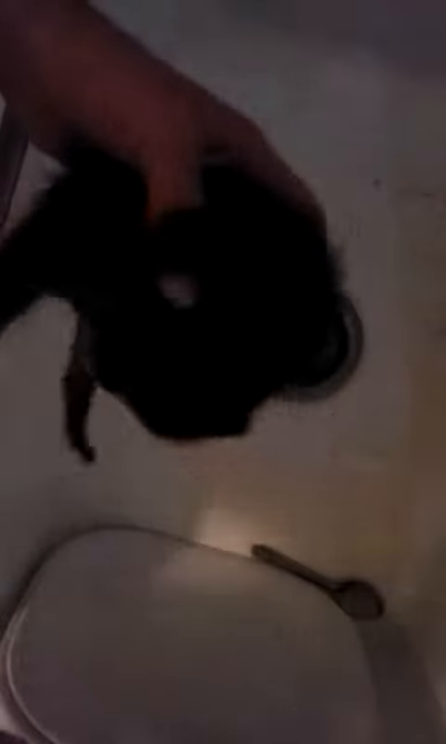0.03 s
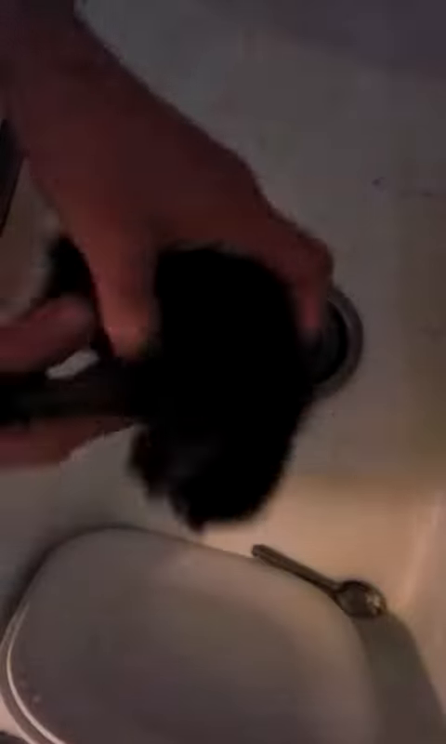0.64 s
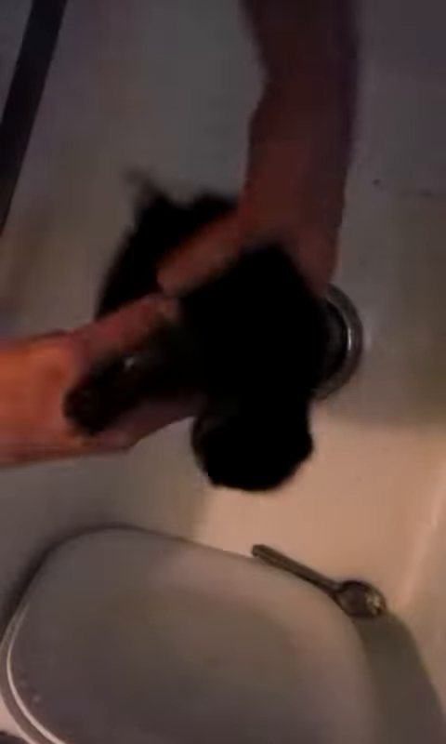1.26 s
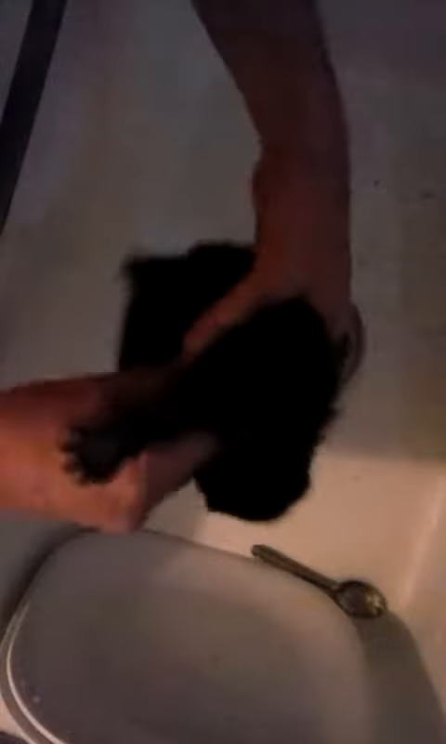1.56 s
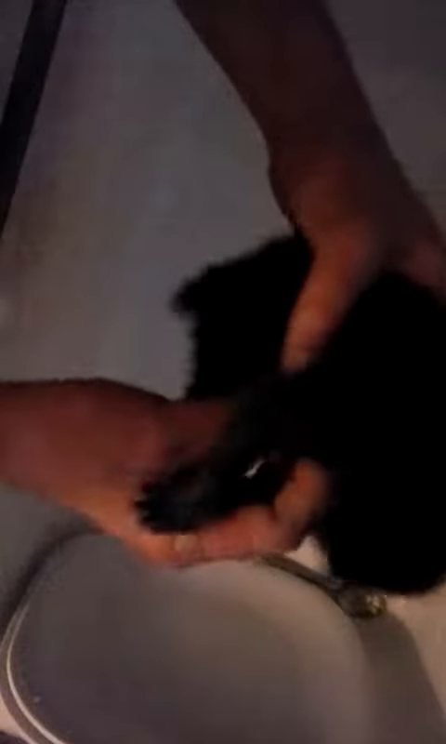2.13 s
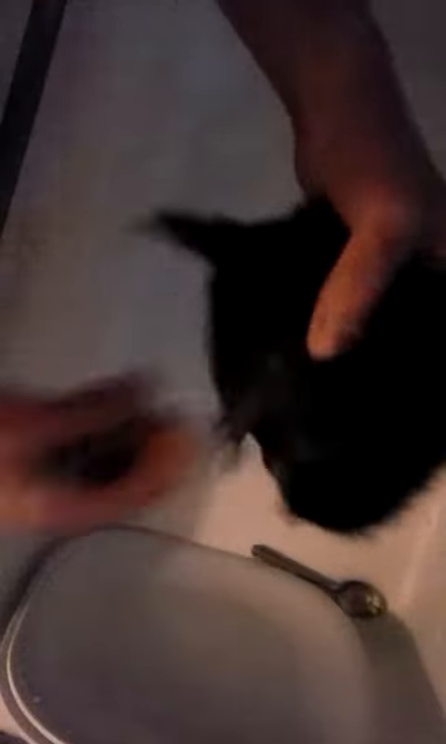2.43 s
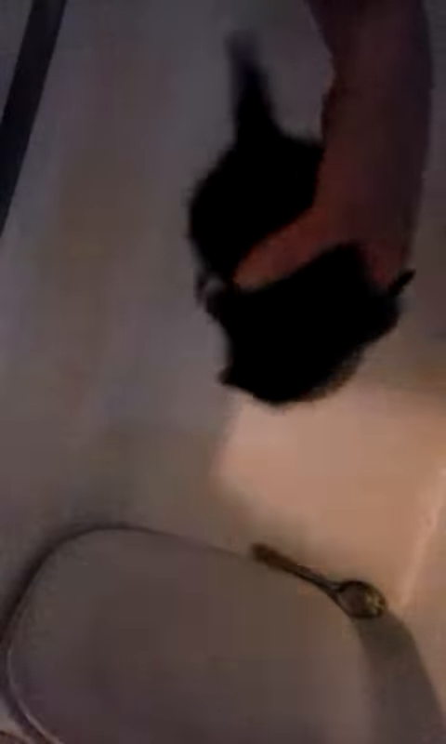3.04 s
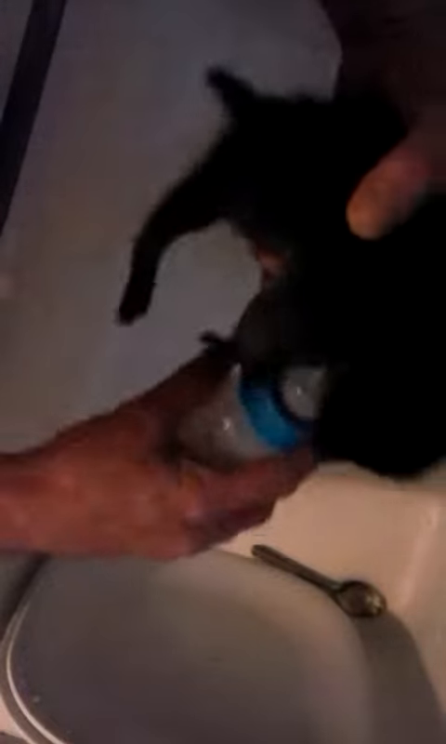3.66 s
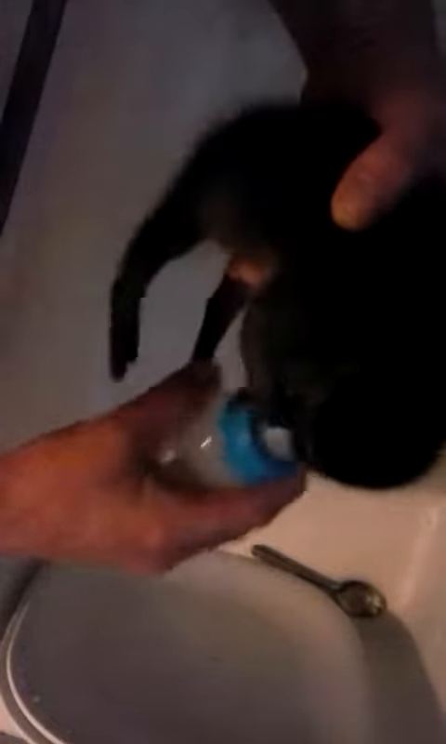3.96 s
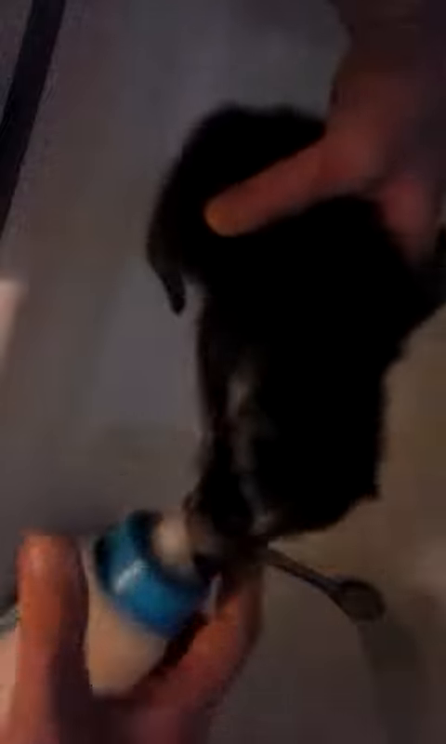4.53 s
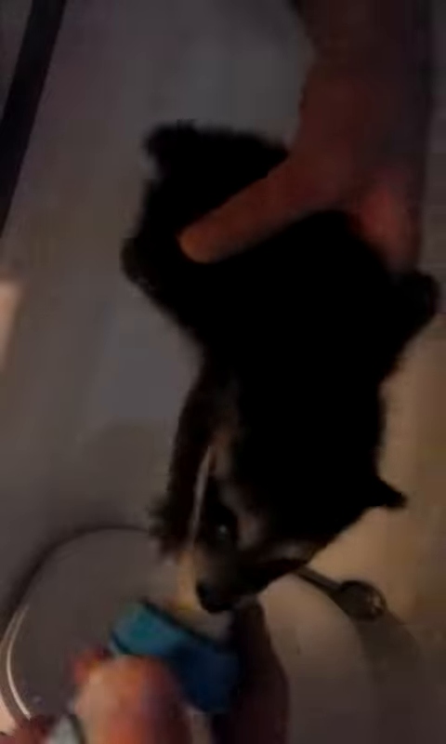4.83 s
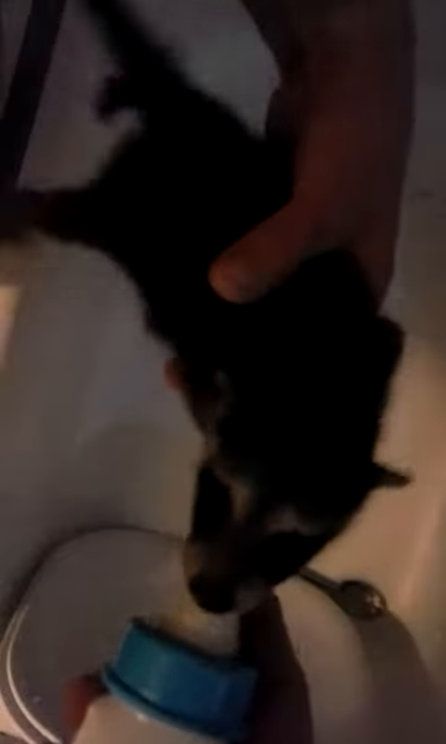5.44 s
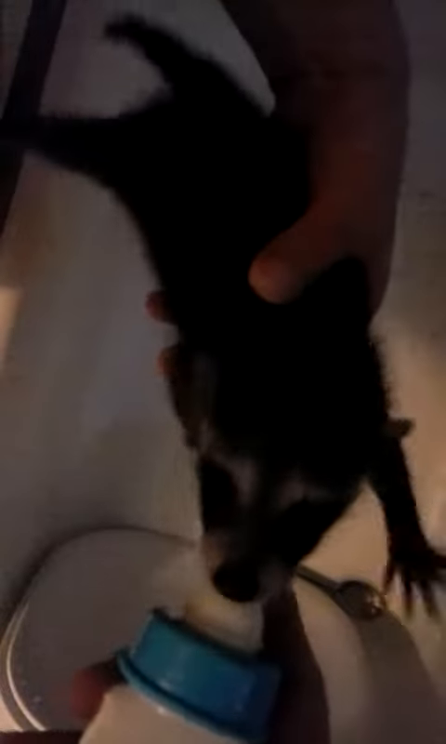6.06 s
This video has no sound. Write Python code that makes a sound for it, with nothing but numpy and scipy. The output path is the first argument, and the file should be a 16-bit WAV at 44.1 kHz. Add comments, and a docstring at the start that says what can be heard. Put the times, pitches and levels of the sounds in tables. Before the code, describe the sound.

Close, high-pitched cries from a raccoon cub in a small room give way to soft lip smacks, tongue clicks and squeaky bottle sucking.

```python
"""A baby raccoon screeches five times in a tub, close by, its vocal folds straining, and pants in between.
Then it sucks at a bottle: wet lip smacks, tongue clicks, bursting milk bubbles, air squeaking at the teat.
Its fur slides under the hand that holds it and its body bumps the tub, whose walls throw its voice back.
There are a few faint knocks; the small room has a low hum and a thin, high electrical whistle."""
import sys
import numpy as np
from scipy import signal
from scipy.fft import rfft, irfft, next_fast_len
from scipy.io import wavfile
from scipy.ndimage import uniform_filter1d, minimum_filter1d

SR = 44100
rng = np.random.default_rng(int(sys.argv[2]) if len(sys.argv) > 2 else 0)


def file_out(sig):
    """Save sig as 16-bit WAV at sys.argv[1]."""
    # one column per channel
    cols = np.atleast_2d(sig).T
    # limit, then scale
    lim = np.clip(cols, -1, 1)
    pcm = np.round(lim * 32767).astype(np.int16)
    wavfile.write(sys.argv[1], SR, pcm)


N = 277830
TIME = np.arange(N) / SR


def gain_of(db):
    return 10 ** (np.asarray(db) / 20)


def unit_rms(x):
    return x / np.sqrt(np.mean(x ** 2) + 1e-20)


def at_hz(points, hz):
    """Interpolates (f, value) points on a log-frequency axis."""
    f, value = np.transpose(points)
    return np.interp(np.log(hz + 1), np.log(f), value)


def span(length_s):
    return TIME[:round(length_s * SR)]


def add(mix, start_s, sound):
    part = mix[max(round(start_s * SR), 0):][:len(sound)]
    part += sound[:len(part)]


def filtered(x, gain_at_hz):
    size = next_fast_len(2 * len(x))
    return irfft(rfft(x, size) * gain_at_hz(np.fft.rfftfreq(size, 1 / SR)), size)[:len(x)]


def coloured(x, spectrum):
    """Filters x by (f/Hz, level/dB) points; rms 1."""
    return unit_rms(filtered(x, lambda hz: gain_of(at_hz(spectrum, hz))))


def lowpass(x, edge_hz, order=12):
    return filtered(x, lambda hz: 1 / (1 + (hz / edge_hz) ** order))


def noise(t):
    whole_seconds = len(t) // SR + 1
    return rng.standard_normal(whole_seconds * SR)[:len(t)]


def wander(t, rate_hz):
    """Random drift up to about rate_hz; rms 1."""
    return unit_rms(lowpass(noise(t), rate_hz, order=4))


def resonate(x, hz, width_hz):
    """Unity-gain resonance that follows the curve hz."""
    carrier = np.exp(2j * np.pi * np.cumsum(hz) / SR)
    pole = np.exp(-np.pi * width_hz / SR)
    return 2 * (carrier * signal.lfilter([1 - pole], [1, -pole], x / carrier)).real


def fuzzy_tone(t, hz, width_hz):
    """Noise through three equal resonances; rms 1."""
    x = noise(t)
    for _ in range(3):
        x = resonate(x, np.broadcast_to(hz, t.shape), width_hz)
    return unit_rms(x)


# room air spectrum: f/Hz, relative level/dB
AIR_SPECTRUM = [(25, -19.5), (42, -6.5), (65, 3.5), (130, -8), (200, -12), (400, -18), (1000, -29),
                (2500, -29.5), (4200, -37.5), (6500, -30), (8250, -13), (10000, -20.5), (15000, -17)]
# hum partials: f/Hz, level/dB
HUM_PARTIALS = [(59, -65.5), (86, -63.5), (119, -65.5)]
# whistle envelope: t/s, relative level/dB
WHISTLE_ENVELOPE = [(0, -46), (1.1, -47.5), (1.7, -52), (2.15, -44), (2.7, -60.5), (2.9, -44), (4.2, -47.5),
                    (4.6, -44.5), (6.3, -46.5)]


def background(air_db=-55.5, whistle_hz=15736, tremolo_hz=11.5):
    """Room air, a wavering low hum and a thin, high electrical whistle with a fast tremolo added."""
    air = gain_of(air_db) * coloured(noise(TIME), AIR_SPECTRUM)
    hum = sum(gain_of(db + 3 * wander(TIME, 5)) * np.sin(2 * np.pi * hz * TIME + wander(TIME, 4.5))
              for hz, db in HUM_PARTIALS)
    tremolo = 1 + .45 * np.sin(2 * np.pi * tremolo_hz * TIME + wander(TIME, 2))
    whistle_db = np.interp(TIME, *np.transpose(WHISTLE_ENVELOPE)) - 1 + 2 * wander(TIME, 35)
    whistle = gain_of(whistle_db) * tremolo * np.sin(2 * np.pi * whistle_hz * TIME)
    return air + np.sqrt(2) * (hum + whistle)


# high hiss of fur and nose: f/Hz, relative level/dB
HISS_SPECTRUM = [(3500, -36.5), (5500, -19.5), (7000, -10.5), (8300, 1), (10500, -8.5), (13000, -16.5),
                 (16000, -20)]
# dull rush of body rub and airway: f/Hz, relative level/dB
RUSH_SPECTRUM = [(150, -33), (420, -3.5), (750, -4.5), (1250, 1), (1700, -12), (2400, -14.5), (3200, -38),
                 (4500, -51)]
# hand strokes: centre t/s, level/dB, half-width/s
STROKES = [(0.003, -46, 0.27), (0.709, -51, 0.091), (2.373, -49, 0.057), (2.84, -55.5, 0.17),
           (2.975, -59.5, 0.024), (4.47, -51, 0.0196), (4.727, -61, .04), (6.156, -54.5, 0.027)]


def fur_rustle(rub_db=-15, resting_db=-63, grain_db=3):
    """Fur slides under the hand with a grainy hiss; the body rubs dully on the tub."""
    strokes = sum(gain_of(db) * np.exp(-((TIME - s) / width_s) ** 2) for s, db, width_s in STROKES)
    grains = noise(TIME) * gain_of(grain_db * wander(TIME, 120))
    friction = coloured(grains, HISS_SPECTRUM) + gain_of(rub_db) * coloured(grains, RUSH_SPECTRUM)
    return (gain_of(resting_db) + strokes) * friction


# tongue clicks: t/s, peak level/dB, f/Hz
CLICKS = [(0.0265, -27, 8100), (0.0567, -22.5, 8800), (0.1451, -18, 8330), (1.057, -8.5, 8540),
          (1.1653, -32.5, 1810), (2.029, -23, 6520), (2.2761, -23.5, 8340), (3.8804, -1.5, 8440),
          (5.26, -10, 7330), (5.264, -17.5, 6700), (5.2933, -16.5, 8330), (5.3966, -14, 8500),
          (5.456, -23, 8784)]


def tongue_clicks(decay_cycles=9.8, droop=.066, rise_s=.0001, fizz=.48):
    """A film of spit snaps; a tiny cavity rings, its pitch falling as it opens."""
    out, t = np.zeros(N), TIME[:SR // 40]
    for start_s, peak_db, hz in CLICKS:
        fade = np.exp(-t * hz / decay_cycles)
        tone = np.sin(2 * np.pi * np.cumsum(hz * (1 + droop * (2 * fade - 1))) / SR)
        snap = (1 - np.exp(-t / rise_s)) ** 2 * fade * (tone + fizz * fuzzy_tone(t, hz, hz / 2))
        snap = lowpass(snap, 1.1 * hz, order=8) - lowpass(snap, hz / 2, order=6)
        add(out, start_s, gain_of(peak_db) * snap / abs(snap).max())
    return out


# pants: t/s, length/s, relative level/dB, wheeze start f/Hz, end f/Hz, wheeze share/0-1
PANTS = [(0.146, 0.052, -26.5, 750, 1510, .3), (0.578, 0.1, -34.5, 936, 1496, 0.16),
         (0.821, 0.065, -36, 1190, 1270, 0.48), (1.24, 0.081, -27, 1400, 1100, 0.6),
         (1.703, 0.074, -31.5, 1331, 450, 0.35), (1.745, 0.036, -45.5, 270, 220, .9),
         (1.936, 0.06, -31.5, 1170, 1290, 0.41), (1.979, 0.063, -34, 1300, 1610, 0.51),
         (2.539, 0.045, -31, 543, 417, 0.54), (3.2, 0.016, -43, 1200, 1400, .4),
         (3.226, 0.045, -34, 1450, 1600, 0.77), (3.622, 0.054, -50.5, 1017, 1104, 0.05)]


def pant(length_s, level_db, from_hz, to_hz, share, hiss_db=-9):
    """Air wheezes through the cub's narrow airway, then hisses in its nose."""
    t = span(length_s)
    rush = coloured(noise(t), RUSH_SPECTRUM)
    rush = unit_rms(rush - lowpass(rush, min(from_hz, to_hz) / 2))
    wheeze = fuzzy_tone(t, np.geomspace(from_hz, to_hz, len(t)), width_hz=260)
    hiss = gain_of(hiss_db) * np.linspace(.3, 1.4, len(t)) * coloured(noise(t), HISS_SPECTRUM)
    swell_db = np.interp(t / length_s, [0, .6, 1], [-13, -1, -14]) + 2 * wander(t, 88)
    breath = unit_rms((1 - share) * rush + share * wheeze) + hiss
    return gain_of(level_db + swell_db) * breath * signal.windows.tukey(len(t), .25)


def roughness(t, length_s, middle, onset=.9):
    """Noisy share of the voice: high at the onset, settling, rising again at the end."""
    settle_s = min(.027, length_s / 4)
    starting = np.exp(-(t / settle_s) ** 2)
    ending = np.exp(-np.maximum(length_s - t, 0) / settle_s) / 2
    return np.clip(middle + (onset - middle) * np.maximum(starting, ending), .2, .95)


def vocal_folds(t, hz, rough):
    """Strained folds slip between a wavering pitch and rasping puffs of air."""
    jitter = 1 + .035 * rough * wander(t, 400) + .045 * rough * wander(t, 60)
    phase = 2 * np.pi * np.cumsum(hz * jitter) / SR
    tone = np.zeros(len(t))
    for k in range(1, 16):
        swell = gain_of(3.5 * wander(t, 45))  # the head jerks about in the tub
        offset = 2 * np.pi * rng.random() * (k not in (2, 4))  # 2 and 4 are reinforced in phase below
        tone += swell * np.cos(k * phase + offset)
    # the mouth is tuned to harmonic 4
    tone = lowpass(unit_rms(tone), 8000, order=2) + .45 * np.cos(4 * phase)
    # the fundamental drops out as the voice breaks up
    tone -= np.minimum(rough / .8, 1) ** 4 * lowpass(tone, 1400)
    puffs = unit_rms((1 + .6 * np.cos(phase)) * noise(t))
    rasp = puffs - lowpass(puffs, 1500, order=6) + gain_of(2) * resonate(puffs, 4 * hz, 400)
    blend = ((1 - rough) * tone + rough * rasp) / np.hypot(1 - rough, rough)
    second_harmonic = gain_of(-9) * (1 - rough) ** 2 * np.cos(2 * phase)
    return (blend + second_harmonic) * gain_of(1.8 * wander(t, 110))


# throat and open mouth: f/Hz, relative level/dB
THROAT_SPECTRUM = [(520, -10.5), (1000, -15.5), (1400, -10), (2100, -7), (2550, -10), (3200, -5.5),
                   (4000, -4), (5200, -16), (7000, -14), (8400, 4), (9400, -1), (11200, -12),
                   (15500, -18.5)]
# screeches, the last with a short extra push: t/s, length/s, relative level/dB, swell/dB, f/Hz,
# end f/Hz, roughness/0-1, low band/dB, top band/dB, catch delay/s, catch depth/dB
SCREECHES = [(0.193, 0.16, -10, 11, 1064, 1078, 0.45, -5.5, -1.5, .043, 1),
             (0.884, 0.16, -20.5, 3, 962, 944, 0.34, -6, 3.5, 0.059, 7.5),
             (2.027, .14, -27, 3.5, 978, 848, 0.29, -5, 0.5, 0.038, 2.5),
             (3.282, 0.16, -10, 4.5, 1039, 1076, .56, -19.5, 1, .042, 9),
             (3.713, 0.13, -16.5, 17, 1080, 847, .34, -6, -9, 0.0472, 4.5),
             (3.84, .026, -33, 2, 562.4, 530, 0.27, 1.5, -2, 0.0042, -8)]


def screech(length_s, level_db, swell_db, pitch_hz, end_hz, rough, low_db, top_db, catch_s, catch_db,
            attack_s=.018, release_s=.014, turn=.36):
    """One push of breath drives the folds, catching briefly; throat and mouth colour it."""
    t = span(length_s + 5 * release_s)
    progress = np.minimum(t / length_s, 1)
    catch = np.exp(-((t - catch_s) / .009) ** 2)
    envelope = np.minimum(t / attack_s, 1) * np.exp(-np.maximum(t - length_s, 0) / release_s)
    scoop = np.maximum(1 - progress / turn, 0) ** 2
    glide = (np.maximum(progress - turn, 0) / (1 - turn)) ** 2
    hz = pitch_hz * (1 - .02 * scoop - .03 * catch) + (end_hz - pitch_hz) * glide
    voice = coloured(vocal_folds(t, hz, roughness(t, length_s, rough)), THROAT_SPECTRUM)
    low, top = lowpass(voice, 2800), voice - lowpass(voice, 6900)
    arch_db = -swell_db * (2 * progress - 1) ** 2
    closing_db = progress - .5  # the closing mouth shifts power to the low band
    voice = (gain_of(low_db + arch_db + closing_db) * unit_rms(low)
             + gain_of(arch_db - closing_db) * unit_rms(voice - low - top)
             + gain_of(top_db + .6 * arch_db) * unit_rms(top))
    return gain_of(level_db - 3 - catch_db * catch) * envelope * voice


# hollow body: f/Hz, relative level/dB
HOLLOW_SPECTRUM = [(150, -30), (400, -4.5), (700, -3), (1150, 4.5), (1700, -3), (2300, 0), (3200, -11),
                   (4500, -34.5), (8000, -44)]
# treble spray: f/Hz, relative level/dB
SPRAY_SPECTRUM = [(2500, -22.5), (4200, -24.5), (5700, -6.5), (8300, 6), (10500, 1), (12500, -7),
                  (16000, -13.5)]
# lip smacks, and faint knocks at 0.521, 1.455, 4.399 and 4.888 s:
# t/s, relative hollow level/dB, relative spray level/dB, ring f/Hz, decay/s
SMACKS_AND_KNOCKS = [(0.521, -52.5, -69.5, 869, 0.014), (1.455, -51.5, -60.5, 823, 0.01),
                     (3.261, -48, -19.5, 1550, 0.011), (3.684, -49, -36, 1052, 0.021),
                     (4.399, -60.5, -69, 1560, .009), (4.888, -43.5, -42, 1145, 0.0066),
                     (5.066, -38.5, -17.5, 2520, 0.024), (5.099, -13.5, -18, 2050, 0.0087),
                     (5.307, -29.5, -23.5, 1820, .02), (5.382, -32, -31.5, 1100, 0.015),
                     (5.419, -29, -30, 1293, 0.0027), (5.582, -26, -25, 2350, 0.013),
                     (5.704, -46, -40.5, 1187, 0.017), (5.878, -31.5, -26, 1203, 0.0065),
                     (5.888, -29, -17.5, 1120, 0.01), (5.921, -35.5, -30.5, 1110, 0.033),
                     (6.031, -49, -33, 1368, 0.011), (6.284, -40.5, -40, 1240, .011)]


def smacks_and_knocks(rise_s=.00042):
    """Lip smacks and a few faint knocks: each a burst of crackle, a hollow ring and a treble spray."""
    out, t = np.zeros(N), TIME[:SR // 8]
    for start_s, hollow_db, spray_db, hz, decay_s in SMACKS_AND_KNOCKS:
        burst = (1 - np.exp(-t / rise_s)) * np.exp(-(t / decay_s) ** .91)
        crackle = burst * gain_of(3 * wander(t, 900))
        hollow = coloured(crackle * noise(t), HOLLOW_SPECTRUM) * np.std(burst)
        ring = burst * fuzzy_tone(t, hz, width_hz=670)
        spray = coloured(crackle * noise(t), SPRAY_SPECTRUM) * np.std(burst)
        add(out, start_s, gain_of(hollow_db + 1) * (hollow + ring) + gain_of(spray_db - 2) * spray)
    return out


# tub wall modes: f/Hz, relative level/dB, t60/s
TUB_MODES = [(168, 0, .11), (215, -4, .09), (330, -8, .08), (430, -11, .08), (1400, -19, .1)]
# body bumps: t/s, relative level/dB
BUMPS = [(1.738, -49.5), (2.555, -48.5), (2.902, -35.5), (2.969, -48)]


def tub_bumps(contact_s=.007):
    """A soft body scuffs against the tub and sets its wall ringing."""
    out, t = np.zeros(N), TIME[:SR // 5]
    ring = sum(gain_of(db - 60 * t / t60) * np.sin(2 * np.pi * hz * t) for hz, db, t60 in TUB_MODES)
    for start_s, level_db in BUMPS:
        scuff = noise(t) * t / contact_s * np.exp(-t / contact_s)
        thud = signal.fftconvolve(scuff, ring)[:len(t)]
        add(out, start_s, 2 * gain_of(level_db) * thud / abs(thud).max())
    return out


# teat squeaks: t/s, length/s, level/dB, start f/Hz, end f/Hz
SQUEAKS = [(5.064, 0.023, -23, 6120, 5380), (5.241, 0.0037, -33, 6800, 3740),
           (5.394, 0.00593, -37, 4630, 3970), (6.188, 0.061, -38, 9930, 7280)]


def teat_squeak(length_s, level_db, from_hz, to_hz):
    """Air drawn through the teat whistles, its pitch falling ever faster."""
    t = span(length_s)
    hz = from_hz + (to_hz - from_hz) * (t / length_s) ** 1.41
    return gain_of(level_db) * fuzzy_tone(t, hz, width_hz=1300) * signal.windows.tukey(len(t), .3)


def milk_bubbles(start_s=5.1, end_s=6.3, per_s=14, loudest_db=-32, spread_db=16.5, decay_s=.0014):
    """Tiny bubbles burst at random around the teat while the cub sucks."""
    out, t = np.zeros(N), span(.02)
    length_s = end_s - start_s
    for when, faintness in rng.random((round(per_s * length_s), 2)):
        burst = np.exp(-t / decay_s) * noise(t)
        pop = coloured(burst, SPRAY_SPECTRUM) + gain_of(-6) * coloured(burst, HOLLOW_SPECTRUM)
        peak = gain_of(loudest_db - spread_db * faintness)
        add(out, start_s + when * length_s, peak * pop / abs(pop).max())
    return out


def reflections(x, delay_s, t60_curve, taps_per_s=3000):
    """Sparse wall echoes of random sign and total energy 1, decaying by (f/Hz, t60/s) points."""
    size = SR // 2
    taps = rng.choice([-1., 1.], size) * (rng.random(size) < taps_per_s / SR) * (TIME[:size] > delay_s)
    hz, t, bands = signal.stft(taps, SR, nperseg=128)
    tail = signal.istft(bands * gain_of(-60 * t / at_hz(t60_curve, hz)[:, None]), SR)[1]
    return signal.fftconvolve(x, tail / np.linalg.norm(tail))[:N]


# room decay: f/Hz, t60/s
ROOM_T60 = [(250, .25), (1000, .22), (2200, .22), (4000, .21), (8500, .27), (15000, .17)]


def scene(tub_db=-3, tub_t60_s=.079, room_db=-12, click_send_db=-9):
    """The cub faces into the tub, whose walls answer at once; the room rings on behind."""
    direct = smacks_and_knocks() + milk_bubbles()
    for source, events in (screech, SCREECHES), (pant, PANTS), (teat_squeak, SQUEAKS):
        for start_s, *settings in events:
            add(direct, start_s, source(*settings))
    clicks, bumps = tongue_clicks(), tub_bumps()
    send = direct + gain_of(click_send_db) * clicks
    tub = gain_of(tub_db) * reflections(send, .0015, [(1000, tub_t60_s)])
    room = gain_of(room_db) * reflections(send + bumps, .0084, ROOM_T60)
    return (direct + clicks + bumps + tub + room + fur_rustle() + background())[None]


def record(dry, ceiling=.9, edge_hz=15900):
    """Fast peak limiter, then a steep low-pass."""
    headroom = np.minimum(1, ceiling / (abs(dry) + 1e-9))
    gain = uniform_filter1d(minimum_filter1d(headroom, 5), 5)
    band_limit = signal.firwin(1023, edge_hz, window=("kaiser", 8), fs=SR)
    return signal.oaconvolve(dry * gain, band_limit[None], "same")


dry = scene()
out = record(dry)
file_out(out)
```